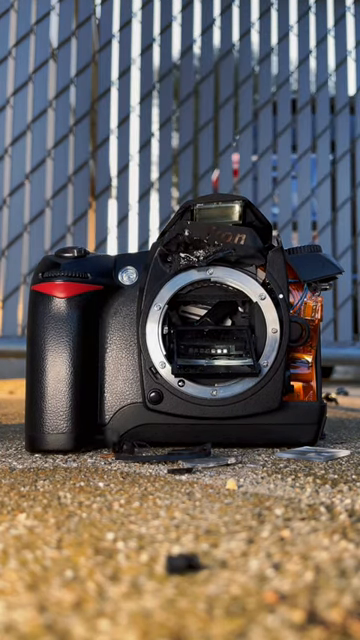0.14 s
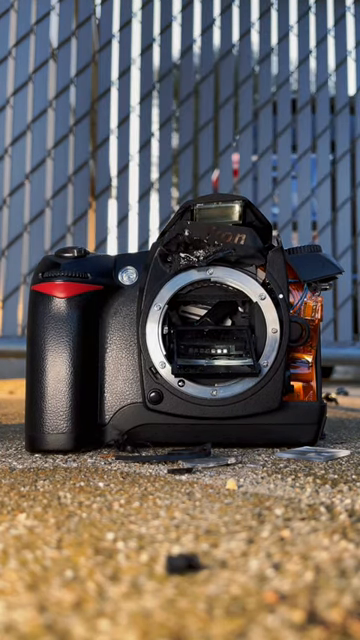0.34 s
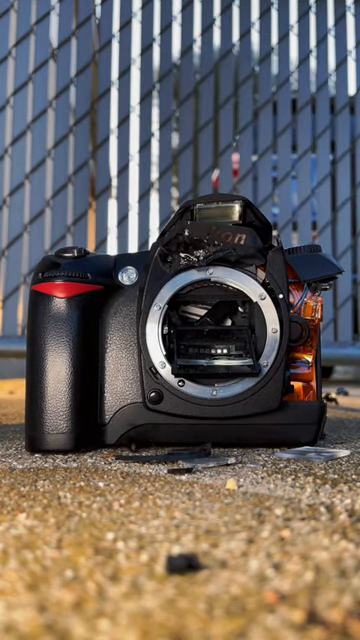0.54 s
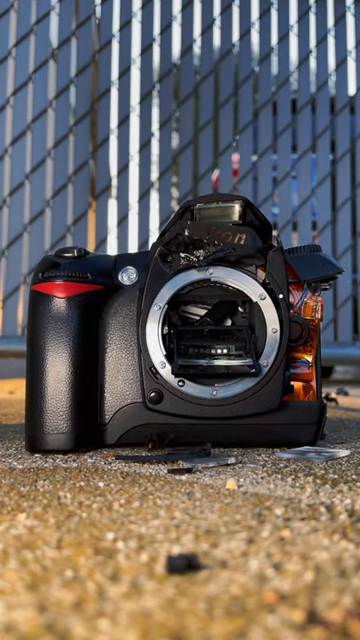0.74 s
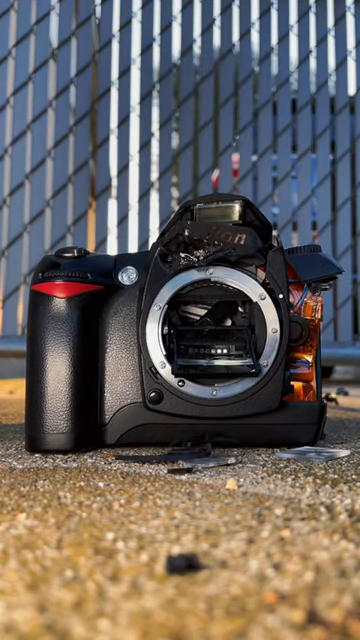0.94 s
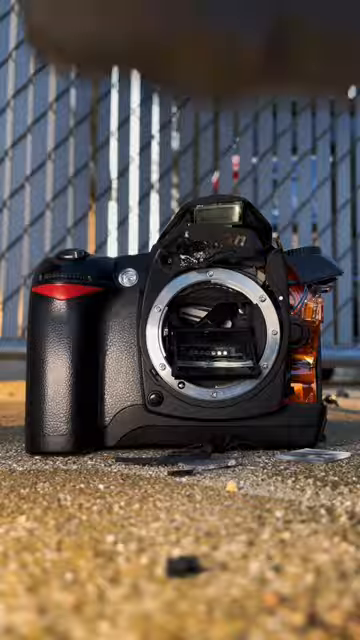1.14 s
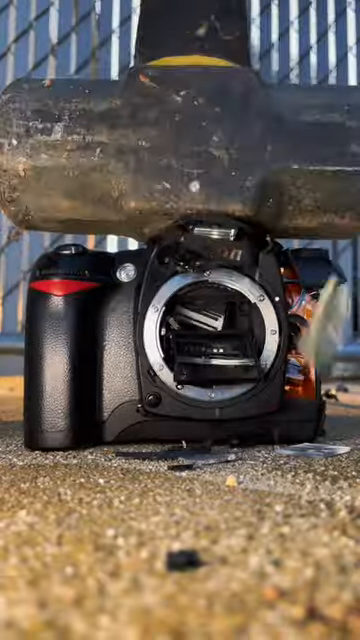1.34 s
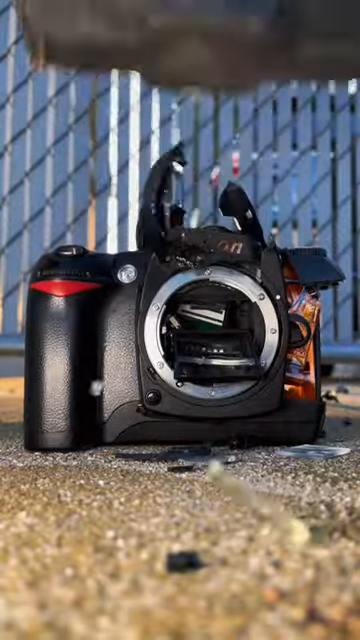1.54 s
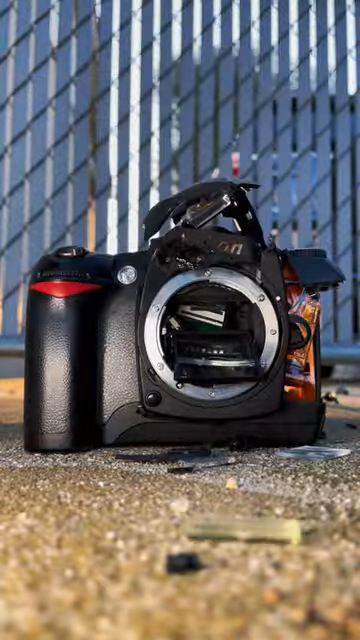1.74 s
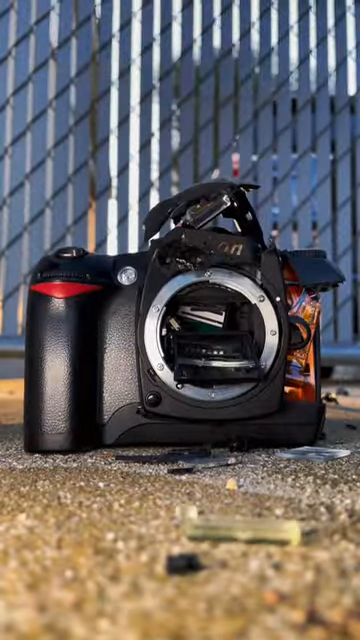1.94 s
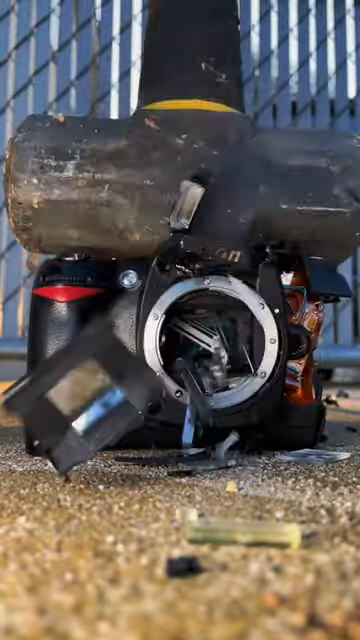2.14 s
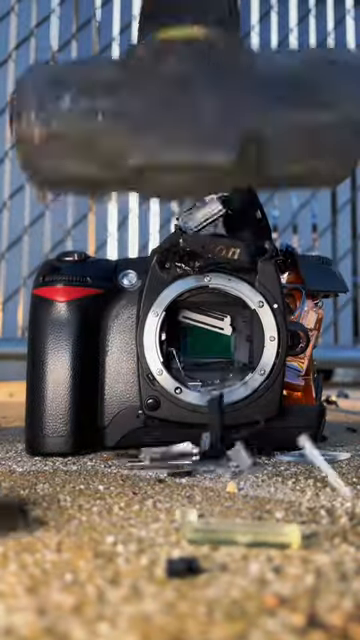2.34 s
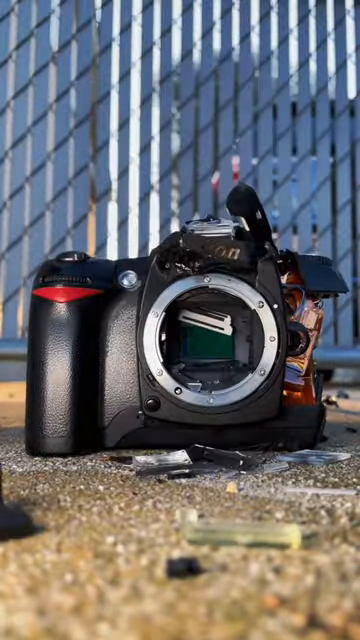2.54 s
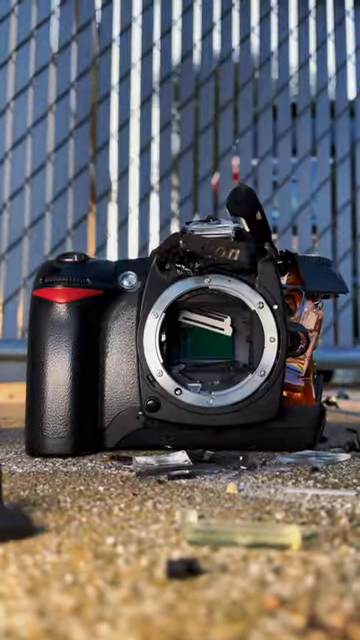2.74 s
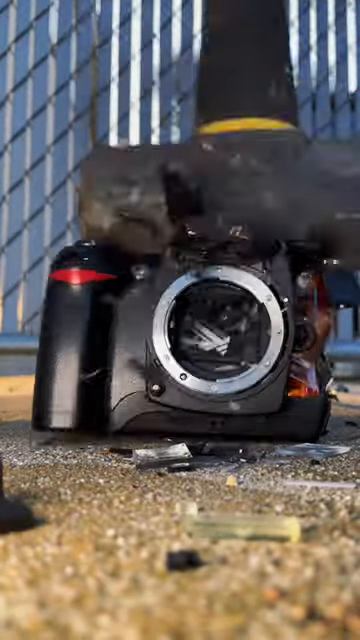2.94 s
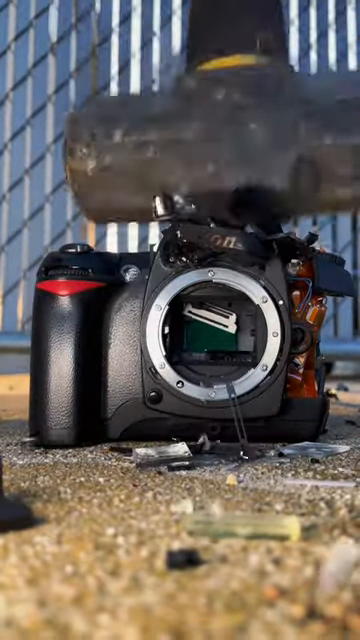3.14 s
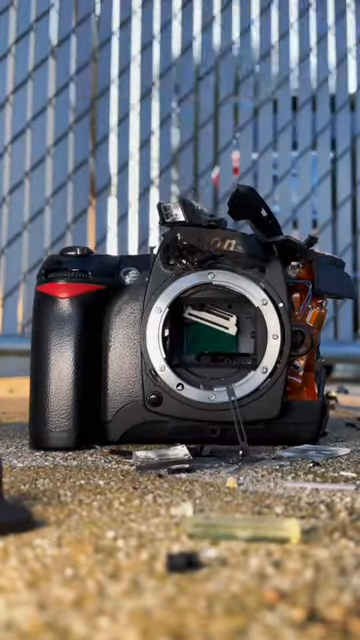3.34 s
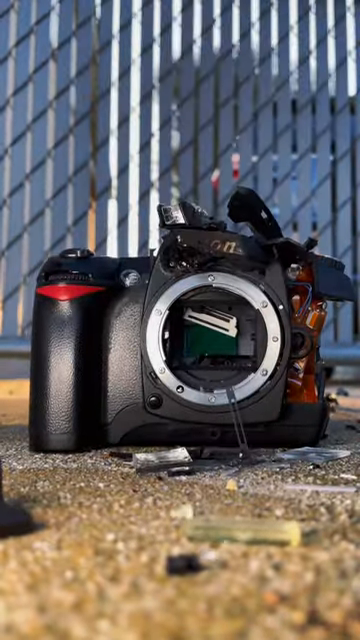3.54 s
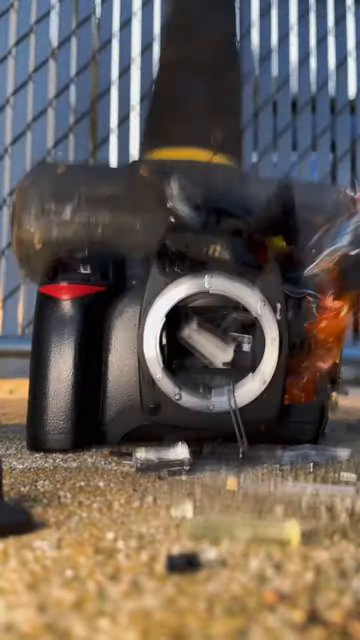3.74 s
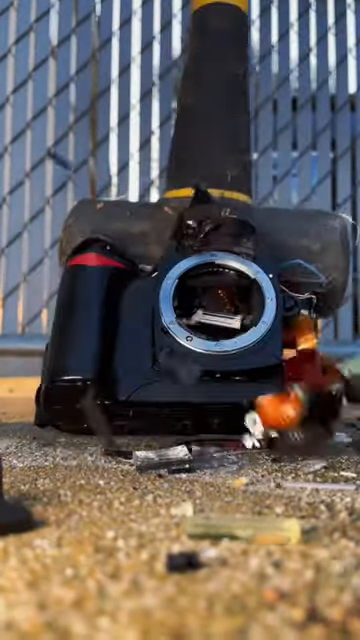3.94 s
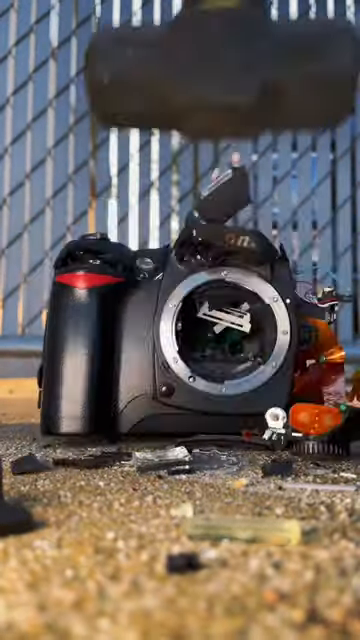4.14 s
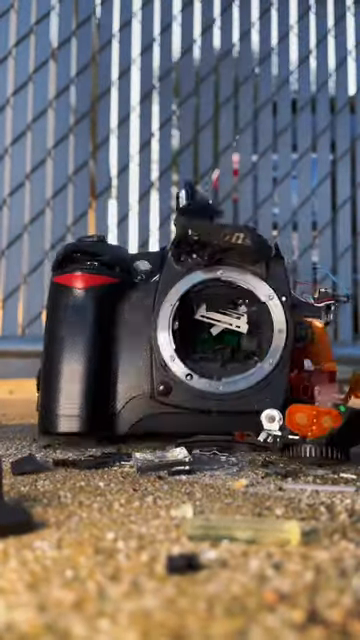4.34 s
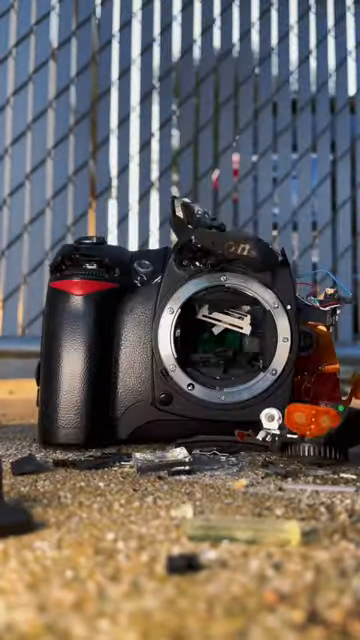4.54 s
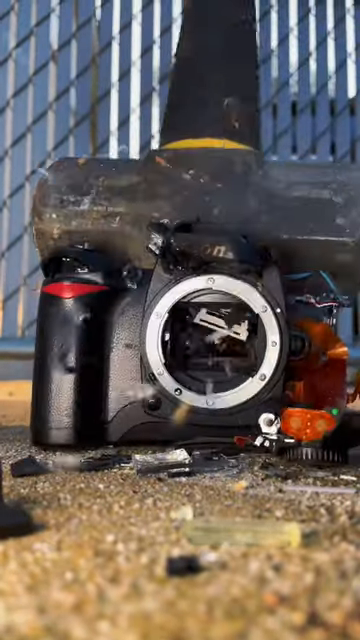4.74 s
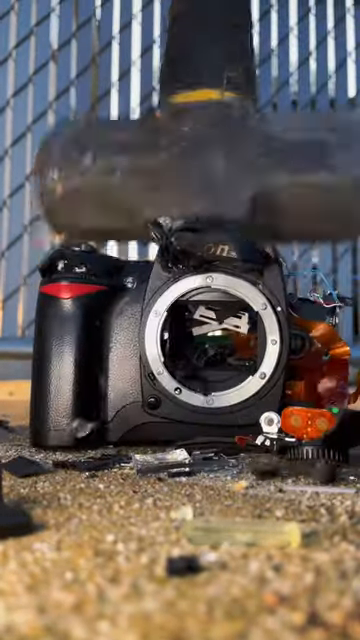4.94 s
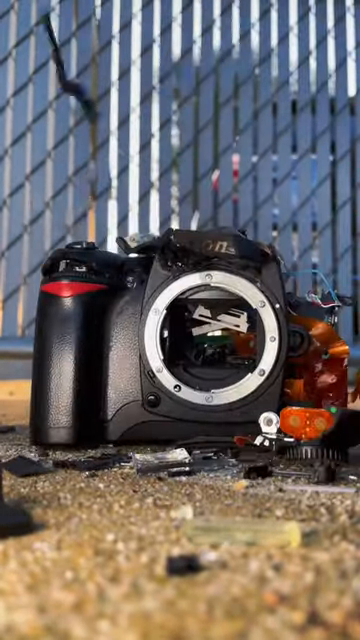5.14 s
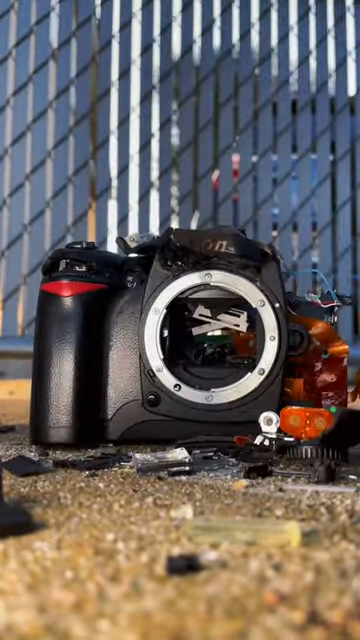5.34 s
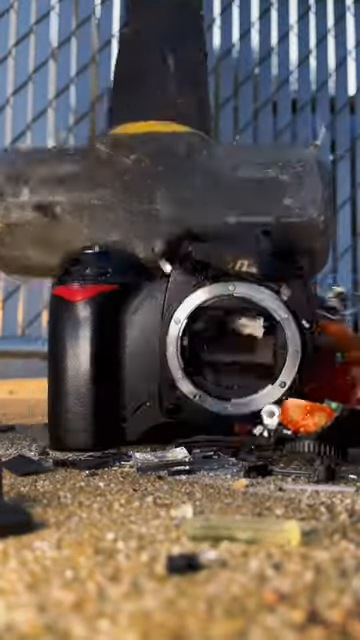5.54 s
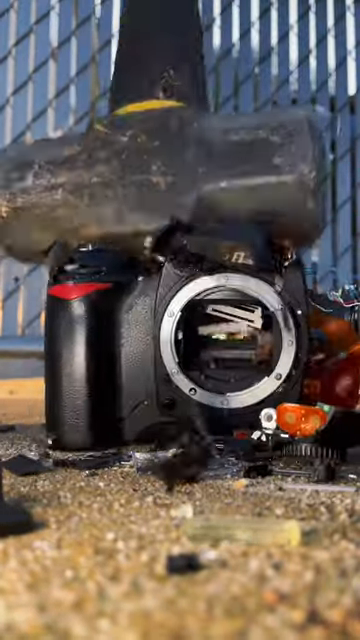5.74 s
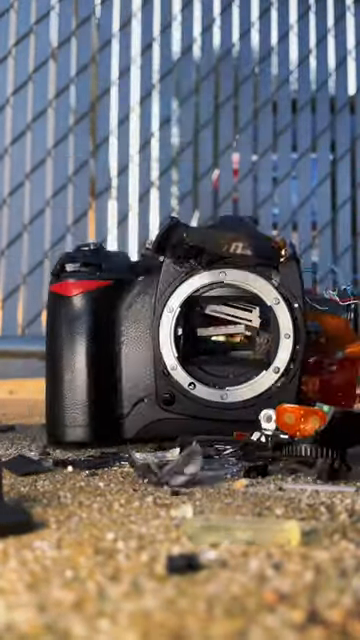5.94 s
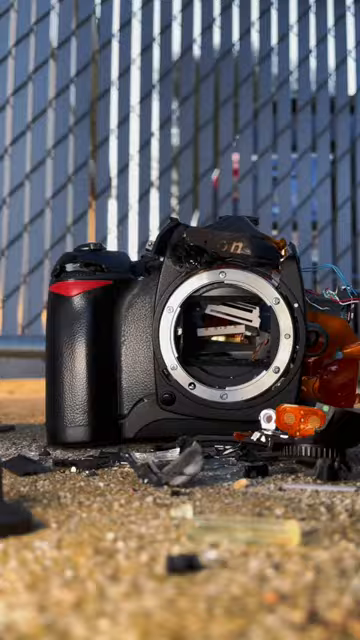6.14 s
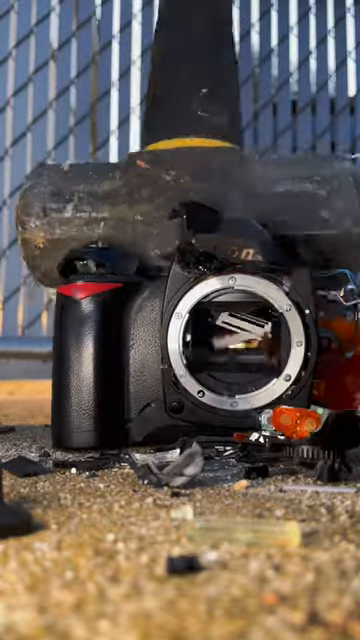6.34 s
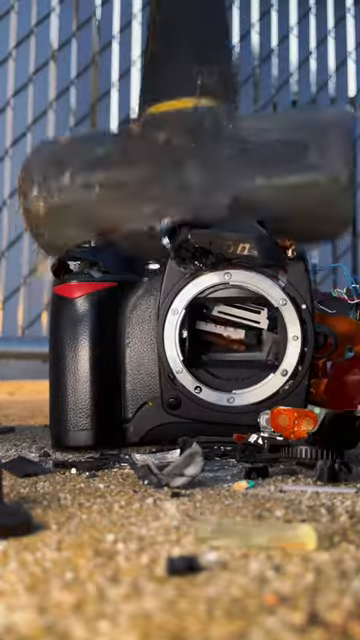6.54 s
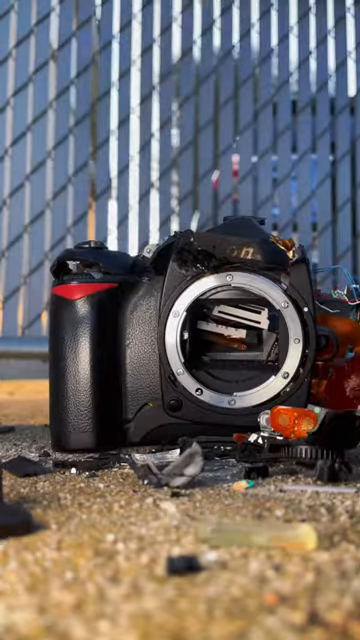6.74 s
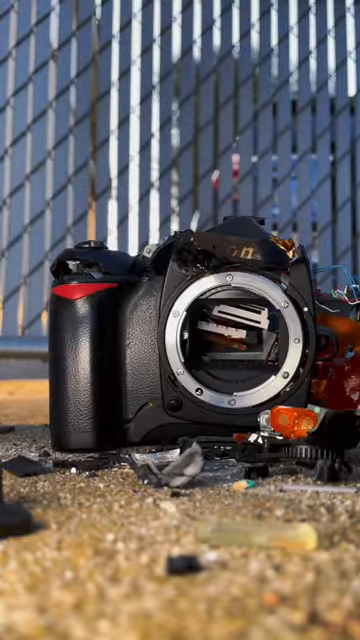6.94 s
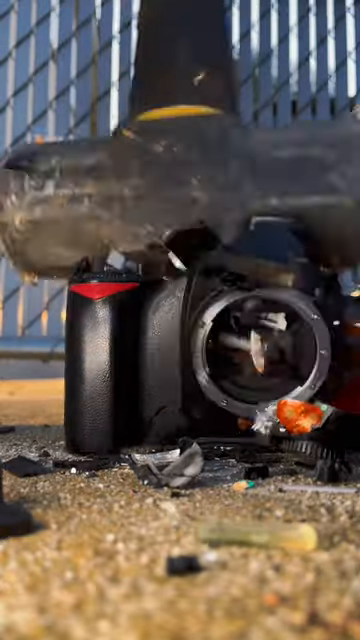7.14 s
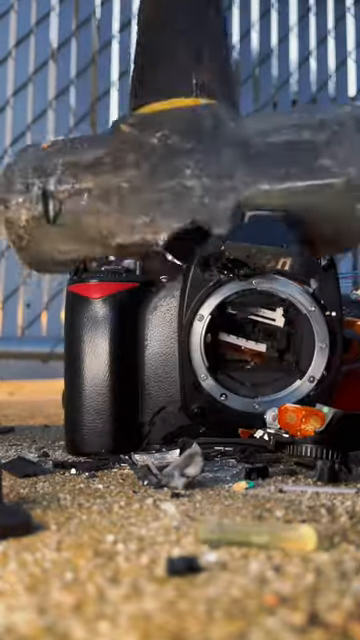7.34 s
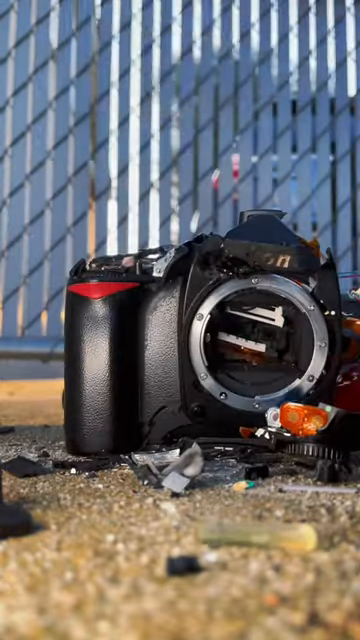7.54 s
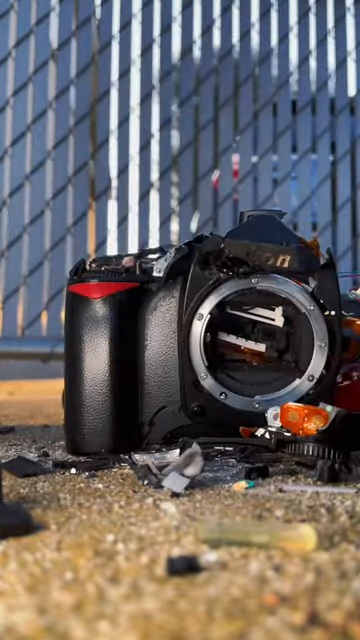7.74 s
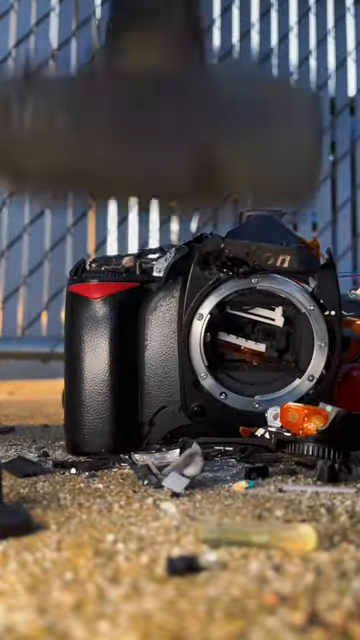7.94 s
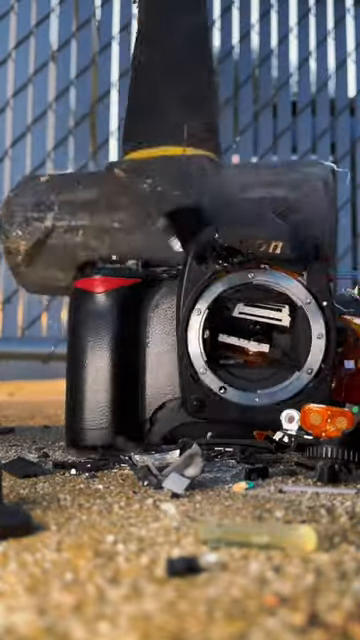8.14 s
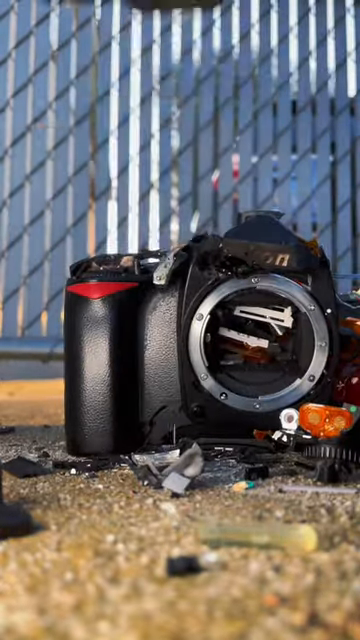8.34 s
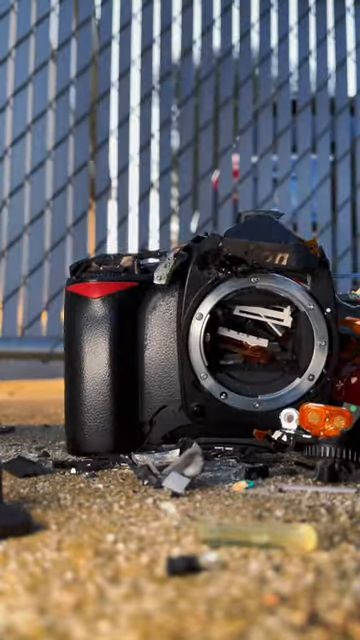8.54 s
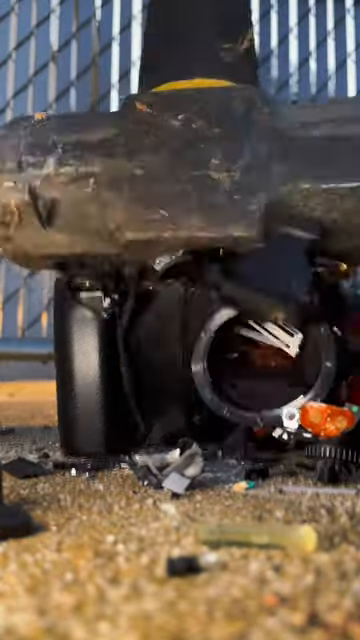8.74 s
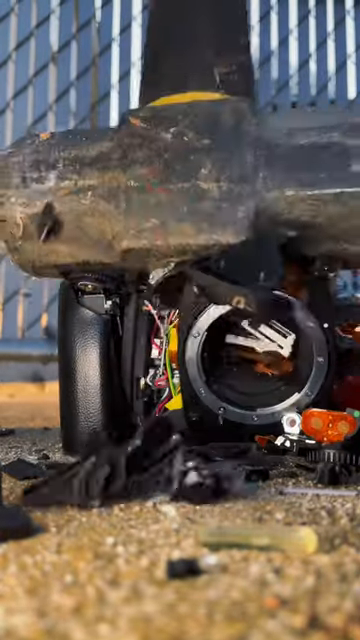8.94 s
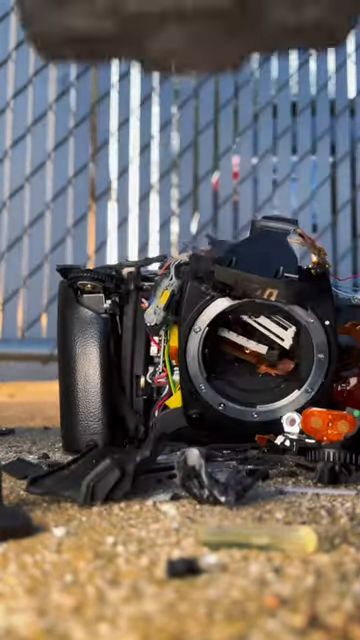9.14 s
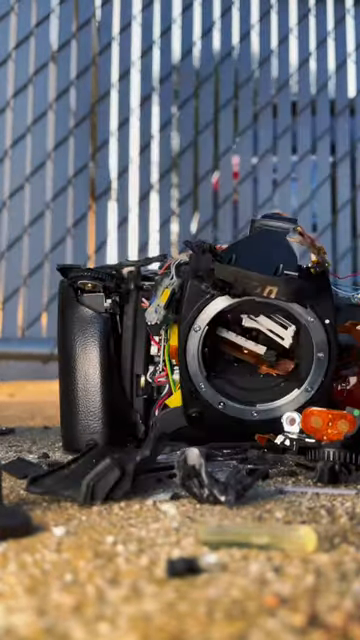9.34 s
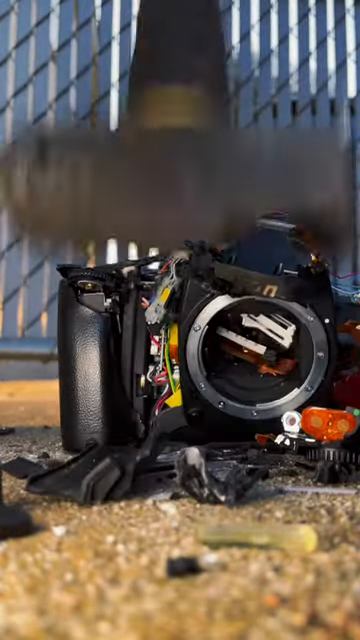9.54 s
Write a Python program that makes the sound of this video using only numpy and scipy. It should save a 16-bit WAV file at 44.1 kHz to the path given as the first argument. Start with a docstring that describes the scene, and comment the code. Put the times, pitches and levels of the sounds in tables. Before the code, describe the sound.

Very close, clipped cracks of crushing plastic, brief dropouts of silence, then skittering shards and tinkling bits on stone outdoors, faint traffic behind.

```python
"""Eleven clipped cracks, each cut off by a short silence, then rattling fragments over distant traffic.
A sledgehammer smashes a camera body on pavement, a hand's width from a phone.
Crushed plastic is dense random clicks through resonances; the jolt holds the microphone at its limit.
Clacks, spray and chips are short noises or clicks that ring; hard parts and shards are struck modes.
Thumps and the wobbling stand are decaying sines; traffic and the rustle of the swing are coloured noise."""
import sys
import numpy as np
from scipy import signal
from scipy.fft import rfft, irfft
from scipy.io import wavfile

SR = 44100
rng = np.random.default_rng(int(sys.argv[2]) if len(sys.argv) > 2 else 0)


def master(y):
    """Save y as 16-bit WAV."""
    cut = np.clip(np.atleast_2d(y).T, -1, 1)
    pcm = np.round(cut * 32767)  # scale
    wavfile.write(sys.argv[1], SR, pcm.astype(np.int16))


N = 427329

LIMIT = .7  # microphone limit, full scale = 1
TOP_HZ = 15900  # upper band edge

# Hammer blows. Each row: start in seconds, first inward swing in microphone limits, its length in seconds,
# time constant of the outward rise in seconds, time the microphone is free again in seconds,
# stand wobble in dB on its mode levels, spray level in dB, spray flight time in seconds.
BLOWS = [ (1.127, 0.053, 0.0011, 0.013, 1.311, -2.5, -39.5, 0.12),
         (2.001, 0.11, 0.0042, 0.028, 2.211, -1, -28, 0.092),
         (2.835, 1.06, 0.039, 0.13, 3.157, 5, -50.5, 0.14),
         (3.680, 0.27, 0.0026, 0.017, 3.874, -6.5, -32, 0.14),
         (4.603, 0.9, 0.057, 0.24, 4.822, -5, -34, 0.1), (5.427, 0.23, .004, 0.027, 5.67, 0, -35, 0.091),
         (6.244, 0.05, 0.0022, 0.012, 6.425, 1.5, -37, 0.082),
         (7.061, 0.054, .001, 0.013, 7.243, 3, -36, 0.1), (7.909, 0, 0.0012, .012, 8.1, 1, -33, 0.088),
         (8.704, 1.86, 0.0895, 0.027, 9.170, -1, -44.5, .12),
         (9.526, 0.18, 0.0022, 0.011, 9.64, -6.5, -48, 0.033)]
# Distant traffic spectrum. Each row: frequency in Hz, relative density in dB per Hz.
TRAFFIC_SPECTRUM = [(25, 1), (60, 0), (90, -4), (135, 2.5), (230, -3.5), (320, -4), (480, -10.5), (900, -4),
                    (1250, -16), (1900, -33), (4000, -34), (16000, -51.5)]
# Distant traffic level. Each row: time in seconds, rms level in dB.
TRAFFIC_LEVEL = [(0, -50.5), (.95, -51.5), (1.3, -47), (9.69, -46)]
# Rustle of the swung hammer. Each row: frequency in Hz, relative density in dB per Hz.
RUSTLE_SPECTRUM = [(500, -4), (1500, -0.5), (3200, -1), (5500, -10), (9000, -17), (16000, -19)]
# Dull thumps and knocks; the first two are faint low bumps before any blow.
# Each row: start in seconds, starting amplitude in dB, frequency in Hz, t60 in seconds.
THUMPS = [(.11, -34.5, 35, .13), (.295, -32.5, 36.8, .15), (2.886, -9, 62.7, .24),
          (3.882, -19.5, 120, .092), (4.665, -14, 47.8, .2), (7.061, -3.5, 190.4, .03),
          (7.062, 2, 649, .019), (8.767, 9, 325, .025), (8.801, .5, 95.5, .37), (9.207, -27, 639, .063),
          (9.227, -8, 51.8, .22), (9.272, -20, 110, .11)]
# Phone stand. Each row: mode frequency in Hz, typical level in dB, t60 in seconds.
STAND_MODES = [(53, -35, 1.6), (64.3, -28, 2.6), (73.2, -33, 2.2), (172, -43, 2.8), (221, -49, 1.2)]
# Single ticks and clacks on the pavement, mostly landing fragments, one faint tick before the first blow.
# Each row: start in seconds, peak in dB, ring in Hz, treble above 5 kHz against the rest in dB.
CLACKS = [(.444, -40, 3970, -2), (1.3547, -16, 6300, 3), (1.3766, -8.5, 1140, -19),
          (1.4528, -11.5, 7700, 1), (1.5846, -24.5, 5750, 17), (1.611, -15, 5660, 6),
          (1.9183, -27, 7800, 3), (2.2313, -9.5, 8200, 1), (2.2439, -11.5, 1190, -3), (2.257, -7, 8800, 19),
          (2.3174, -13.5, 5640, 4), (2.4237, -14, 3680, -7), (2.5287, -20, 3860, 2),
          (2.5414, -16, 2410, 6.5), (3.192, -26, 3860, -6), (3.3223, -31.5, 15500, 11.5),
          (3.418, -33.5, 4000, -.5), (3.478, -36, 4920, -1), (3.8821, -3, 2205, -18),
          (3.8954, -5.5, 4480, -3), (3.9125, -4, 3180, -8), (3.921, -5.5, 3870, 0),
          (4.004, -8.5, 2930, -1.5), (4.025, -15, 2600, -5), (4.0686, -15, 2970, -10),
          (4.1222, -17, 8700, 9), (4.226, -17, 2700, 4), (4.276, -10, 3040, -10), (4.3832, -29, 3300, -5),
          (4.4244, -21, 4500, 2.5), (4.541, -22.5, 5800, 9), (4.8351, -6, 1230, -1),
          (4.8682, -22, 3300, -6), (4.9287, -15.5, 3670, -13), (5.0203, -22, 1700, -10),
          (5.2055, -8, 1810, -13), (5.3382, -28, 7880, 10), (5.734, -15, 12000, 12),
          (5.8085, -11.5, 7200, 15), (5.8824, -26.5, 3860, -4), (5.928, -36, 3020, -4),
          (6.444, -20.5, 1530, -18), (6.475, -13.5, 2170, -4), (6.4878, -6, 2340, -5),
          (6.5255, -16, 9800, 4), (6.6628, -29.5, 4110, -3), (7.2428, -13.5, 7430, 11),
          (7.263, -21, 1730, -8), (7.314, -19, 6030, 6), (7.3718, -24, 5850, 9), (7.4305, -27.5, 7400, 9),
          (7.5177, -26, 2680, -4), (7.5725, -17.5, 2830, 5), (7.625, -27, 5990, -1),
          (7.6466, -24.5, 4110, 9), (7.673, -28, 6460, 3), (8.1005, -13, 2355, -2),
          (8.1134, -13.5, 3620, -3), (8.1358, -15.5, 2040, -7), (8.1834, -18, 2170, -3),
          (8.2183, -20.5, 2440, -5), (8.3122, -22, 930, -10), (8.3495, -13, 1670, -6),
          (8.3599, -12, 2140, -7), (8.4213, -9.5, 6000, 0), (8.4445, -15.5, 2310, -17),
          (8.4885, -22.5, 3140, -4), (9.2383, -25, 3360, -1.5), (9.6833, -18.5, 11240, 3)]
# Colour of a contact with the stone. Each row: frequency in Hz, gain in dB.
CONTACT_SPECTRUM = [(100, -20), (500, -9), (1100, 0.5), (3000, 1), (7000, -2), (11000, -7.5), (16000, -8)]
# Colour of the fine spray. Each row: frequency in Hz, gain in dB.
SPRAY_SPECTRUM = [(100, -8.5), (500, -9.5), (1100, 0.5), (1900, -7.5), (3100, 2.5), (4600, -5.5),
                  (6500, -1.5), (10000, -9.5), (16000, -12.5)]
# Shell giving way under the hammer. Each row: start in seconds, peak in dB, length in seconds,
# resonance in Hz.
CRUSHES = [(1.129, 14, .0074, 6160), (2.001, 16, .017, 6530), (2.835, 12.5, .023, 3420),
           (2.860, 1.5, .036, 4270), (2.874, 8, .0087, 3050), (2.903, -15.5, .048, 3200),
           (3.680, 10, .011, 3050), (4.601, 10, .02, 2630), (4.622, 1, .038, 3570), (4.662, 4, .015, 3500),
           (4.699, -9.5, .022, 5500), (4.729, -23.5, .037, 3500), (5.428, 16, .018, 2400),
           (6.247, 10, .010, 2040), (7.060, 10, .0087, 3480), (7.909, 12.5, .0066, 7080),
           (8.703, 12, .011, 2040), (8.804, -6.5, .064, 3460), (9.527, 10, .0061, 3560)]
# Single parts snapping under the hammer. Each row: start in seconds, peak in dB, length in seconds.
SNAPS = [(2.028, 5, .0027), (2.070, 5.5, .0018), (2.077, 5.5, .0035), (2.898, 9.5, .0014),
         (3.037, -7, .0011), (3.069, -1, .0017), (3.711, 8, .0004), (3.728, 5.5, .0003),
         (3.776, 2.5, .0006), (3.803, 1.5, .0005), (3.814, -1.5, .0004), (3.855, -10, .0012),
         (4.688, 3, .0053), (4.722, 1, .0045), (4.785, -10.5, .0022), (5.476, 0, .0018), (5.490, 2, .0029),
         (5.497, 4, .001), (5.546, -2, .0005), (7.11, 5, .0009), (8.733, 7, .0014), (8.767, -2.5, .0033),
         (8.786, -11, .008), (8.872, 14, .0032), (8.908, 2, .0022), (9.145, -8, .0028), (9.54, 3.5, .0014),
         (9.588, -4.5, .0005)]
# Colour of the breaking shell. Each row: frequency in Hz, gain in dB.
SHELL_SPECTRUM = [(40, -13.5), (200, -5), (600, -4.5), (1500, -3.5), (3300, -4), (6000, -5), (9000, -10.5),
                  (16000, -17)]
# Small hard part dropping. Each row: start in seconds, level in dB.
PINGS = [(1.452, -36), (1.611, -35.5)]
# Its modes. Each row: frequency in Hz, typical level in dB, t60 in seconds.
PING_MODES = [(2024, -12.5, .15), (3180, -7.5, .15), (3666, -3, .25), (4020, -7, .2), (4900, -10, .15),
              (5470, -4.5, .16), (5660, -2.5, .2), (6100, -7, .18), (6850, -8, .18), (7060, -6, .28),
              (7596, -6, .2), (8651, -5, .2), (9227, -9, .16), (11400, -12, .16), (12660, -12, .14)]
# Tiny screws and shards that sing on after landing.
# Each row: start in seconds, typical level in dB, frequency in Hz, nominal t60 in seconds.
TINKLES = [(2.224, -30, 8930, .44), (2.257, -33, 14510, .17), (2.275, -32, 10500, .18),
           (2.529, -40, 3600, .18), (2.54, -38, 2400, .15), (3.939, -30, 8940, .14),
           (4.003, -29, 10260, .06), (5.084, -43, 1950, .2), (5.734, -29.5, 3740, .041),
           (5.808, -32.5, 3830, .064), (5.969, -51, 4460, .15), (7.372, -41, 5830, .12),
           (7.626, -41, 5980, .059), (8.39, -37.5, 7030, .18)]

RUSTLE_REST_DB, RUSTLE_SWING_DB = -73, -61.5
SWING_RISE_S, SWING_FALL_S = .17, .4  # time constants
HOP_S, HOP_LOSS_DB = .027, 16  # typical delay of the second touch, its loss
CHIP_FIRST_S, CHIP_SPREAD_S = .19, .33  # after the blow
CHIP_OVER_SPRAY_DB, CHIP_FADE_DB_PER_S = 16, 29
CHIP_HZ, CHIP_TREBLE_DB_PER_OCTAVE = 4200, 9  # a smaller chip rings higher and ticks brighter
SNAP_HZ = 3600
BOUNCE_S, BOUNCE_SHARE, BOUNCE_LOSS_DB = .049, .8, 5  # first flight, share left for the next, loss


def undb(db):
    """Decibels to gain."""
    return 10 ** (np.asarray(db) / 20)


def clock(length_s):
    """Sample times in seconds."""
    return np.arange(int(length_s * SR)) / SR


def fade(t, t60):
    """Exponential decay from time 0, 60 dB down at t60."""
    return np.exp(-np.log(1000) * np.maximum(t, 0) / t60)


def add(track, start_s, sound):
    """Mix a sound into a track, cut at the end."""
    i = int(np.clip(start_s * SR, 0, N - 1))
    track[i:i + len(sound)] += sound[:N - i]


def unit(x):
    """Scale to rms 1."""
    return x / np.sqrt(np.mean(x ** 2))


def colour(x, points, size=1024):
    """Causal minimum-phase filter with a (Hz, dB) spectrum, built from its cepstrum."""
    hz, db = np.transpose(points)
    f = np.maximum(np.fft.rfftfreq(size, 1 / SR), 1)
    log_gain = np.log(undb(np.interp(np.log(f), np.log(hz), db)))
    cepstrum = irfft(log_gain)
    # fold onto positive times
    cepstrum[1:size // 2] *= 2
    cepstrum[size // 2 + 1:] = 0
    impulse = irfft(np.exp(rfft(cepstrum)))
    return signal.fftconvolve(x, impulse)[:len(x)]


def resonate(x, hz, q):
    """One resonance, gain 1 at its centre."""
    b, a = signal.iirpeak(min(hz, TOP_HZ), max(q, 1), fs=SR)
    return signal.lfilter(b, a, x)


def grains(count, rate_hz, spread_db):
    """Random clicks of either sign at a mean rate, most small and a few large."""
    hit = rng.random(count) < rate_hz / SR
    sign = rng.choice([-1, 1], count)
    size = np.minimum(rng.exponential(size=count), 4)
    return hit * sign * undb(spread_db * size)


def ring(modes, length_s):
    """Decaying modes, each struck a little differently."""
    t = clock(length_s)
    return sum(undb(db + rng.normal()) * np.sin(2 * np.pi * hz * t) * fade(t, t60) for hz, db, t60 in modes)


def chatter(t, t60, rate_hz):
    """A first landing, then small random touches that die away."""
    touches = grains(len(t), rate_hz, spread_db=2) * fade(t, t60)
    touches[0] = 2
    return touches / np.linalg.norm(touches)


def background():
    """Traffic hums far off; a faint rustle wavers above it and swells with each swing."""
    t = np.arange(N) / SR
    traffic_db = np.interp(t, *np.transpose(TRAFFIC_LEVEL))
    distance = np.min([np.maximum((s - t) / SWING_RISE_S, (t - s) / SWING_FALL_S) for s, *_ in BLOWS], axis=0)
    swing = np.exp(-distance)  # 1 at each blow
    waver = np.interp(t, np.linspace(0, N / SR, 90), rng.standard_normal(90))
    traffic = unit(colour(rng.standard_normal(N), TRAFFIC_SPECTRUM, size=8192))
    rustle = unit(colour(rng.standard_normal(N), RUSTLE_SPECTRUM))
    rustle_gain = (undb(RUSTLE_REST_DB) + undb(RUSTLE_SWING_DB) * swing) * undb(2 * waver)
    return undb(traffic_db) * traffic + rustle_gain * rustle


def ground():
    """Dull thumps and knocks as decaying sines; the stand's modes wobble from each blow to the next."""
    out, t = np.zeros(N), clock(.6)
    for s, db, hz, t60 in THUMPS:
        add(out, s, -undb(db) * np.sin(2 * np.pi * hz * t) * fade(t, t60))
    ends = [blow[0] for blow in BLOWS[1:]] + [N / SR]
    for (s, *_, wobble_db, spray_db, flight_s), end_s in zip(BLOWS, ends):
        add(out, s, undb(wobble_db) * ring(STAND_MODES, end_s - s))
    return out


def hops():
    """Each tick or clack is followed by a second, softer touch: rows as in CLACKS."""
    return [(s + HOP_S * rng.uniform(.5, 1.5), db - HOP_LOSS_DB, hz, treble_db)
            for s, db, hz, treble_db in CLACKS]


def chips(count=10, scatter_db=2.5, scatter_octaves=.6):
    """Small chips land after each blow, thickly then thinly, the later the weaker: rows as in CLACKS."""
    rows = []
    for s, *_, spray_db, flight_s in BLOWS:
        for k in range(count):
            age_s = CHIP_FIRST_S + CHIP_SPREAD_S * ((k + rng.random()) / count) ** 2
            db = spray_db + CHIP_OVER_SPRAY_DB - CHIP_FADE_DB_PER_S * age_s + scatter_db * rng.normal()
            octaves = scatter_octaves * rng.normal()
            rows.append((s + age_s, db, CHIP_HZ * 2 ** octaves, CHIP_TREBLE_DB_PER_OCTAVE * octaves))
    return rows


def clacks(tick_t60=.012, skid_db=-15, skid_t60=.07, ring_db=11, ring_q=16, overtone_db=7, overtone_q=60):
    """Each contact ticks on the stone, skids briefly and rings with its own note and a few stray overtones."""
    out, t = np.zeros(N), clock(.088)
    lowpass = signal.butter(3, 5000, fs=SR, output="sos")
    highpass = signal.butter(3, 5000, "hp", fs=SR, output="sos")
    for s, db, hz, treble_db in CLACKS + hops() + chips():
        contact = rng.standard_normal(len(t)) * fade(t, tick_t60)
        skid = unit(grains(len(t), 1700, spread_db=2)) * fade(t, skid_t60)
        tick = colour(contact + undb(skid_db) * skid, CONTACT_SPECTRUM)
        overtones = sum(resonate(tick, f, overtone_q) for f in rng.uniform(1500, 12000, size=5))
        # small, high pieces ring for more cycles than large ones
        note = resonate(tick, hz, ring_q * hz / 4000)
        clack = tick + undb(ring_db) * note + undb(overtone_db) * overtones
        lower = unit(signal.sosfilt(lowpass, clack))
        treble = unit(signal.sosfilt(highpass, clack))
        clack = lower + undb(treble_db) * treble
        add(out, s, undb(db) * clack / np.abs(clack).max())
    return out


def jolts(creep_s=.068):
    """Each shock throws the microphone off centre, up to twice its limit; it creeps back exponentially."""
    out, t = np.zeros(N), clock(1.1)
    for s, inward, swing_s, rise_s, free_s, *_ in BLOWS:
        dip = inward * np.sin(np.pi * np.minimum(t / swing_s, 1))
        thrown = 2 * (1 - np.exp(-np.maximum(t - swing_s, 0) / rise_s))
        creep = np.exp((free_s - s - t) / creep_s)  # reaches the limit at free_s
        add(out, s, LIMIT * (np.minimum(thrown, creep) - dip))
    return out


def spray(rate_hz=500, ring_db=15, ring_q=60, clump_db=4):
    """Splinters rain down in clumps, thickest at their flight time, each size with its own note."""
    out, t = np.zeros(N), clock(1.1)
    for s, *_, db, flight_s in BLOWS:
        notes_hz = np.geomspace(1100, 13000, num=24) * np.exp(.06 * rng.standard_normal(24))
        patter = 0
        for hz in notes_hz:
            landings = grains(len(t), rate_hz / len(notes_hz), spread_db=2.5)
            patter = patter + landings + undb(ring_db) * resonate(landings, hz, ring_q)
        knots = t[::800]
        clumps = np.interp(t, knots, rng.standard_normal(len(knots)))
        patter = unit(colour(patter, SPRAY_SPECTRUM) * undb(clump_db * clumps))
        rain = t / flight_s * np.exp(1 - t / flight_s)  # peaks at 1
        add(out, s, undb(db) * patter * rain)
    return out


def cracks(rate_hz=9000, release_t60=.011, ring_db=3, ring_q=6):
    """Dense fractures run through the shell while it is crushed, and ring the piece that gives way."""
    out, t = np.zeros(N), clock(.1)
    for s, db, length_s, hz in CRUSHES + [(*snap, SNAP_HZ) for snap in SNAPS]:
        fractures = grains(len(t), rate_hz, spread_db=2)
        fractures[0] = 2
        burst = colour(fractures * fade(t - length_s, release_t60), SHELL_SPECTRUM)
        burst = burst + undb(ring_db) * resonate(burst, hz, ring_q)
        # the largest peak points inward
        add(out, s, -undb(db) * burst / burst[np.argmax(np.abs(burst))])
    return out


def pings(chatter_t60=.16, tick_db=9, count=4):
    """The hard part bounces ever lower and chatters on the stone, every touch a tick and a fresh ring."""
    out, t = np.zeros(N), clock(.3)
    for s, drop_db in PINGS:
        for k in range(count):
            # it lands on a different spot each time, which favours other modes
            modes = [(hz, db + 3 * rng.normal(), t60) for hz, db, t60 in PING_MODES]
            body = ring(modes, length_s=.3)
            body += undb(tick_db) * rng.standard_normal(len(body)) * fade(t, .0092)
            touches = chatter(t, chatter_t60, rate_hz=260)
            add(out, s, undb(drop_db - k * BOUNCE_LOSS_DB) * signal.fftconvolve(touches, body))
            s += BOUNCE_S * BOUNCE_SHARE ** k
    return out


def tinkles(twin_db=-4):
    """A slightly uneven shard has two close modes, which beat, and is struck afresh as it skitters."""
    out = np.zeros(N)
    for s, db, hz, t60 in TINKLES:
        twin_hz = hz * (1 + rng.uniform(.00648, .024))
        body = ring([(hz, db, t60 / 2), (twin_hz, db + twin_db, t60 / 2)], length_s=.3)
        touches = chatter(clock(.3), 2 * t60, rate_hz=300)
        add(out, s, signal.fftconvolve(touches, body))
    return out


def yard(x, wet_db, t60):
    """Fence and walls return a thin, short echo: decaying random reflections after 8 ms."""
    t = clock(.5)
    reflections = colour(grains(len(t), 2500, spread_db=1.5), [(200, 3), (4000, .5), (16000, -6)])
    echo = reflections * fade(t, t60) * (t > .008)
    return undb(wet_db) * signal.fftconvolve(x, echo / np.linalg.norm(echo))[:N]


def scene():
    """Everything that reaches the microphone."""
    shell = cracks()
    debris = clacks() + spray() + pings() + tinkles()
    echoes = yard(shell, wet_db=-22, t60=.15) + yard(debris, wet_db=-19.5, t60=.097)
    return (shell + debris + echoes + ground() + jolts() + background())[None]


def record(dry):
    """Hard clipping blocks sound while held at the limit; a coupling capacitor drains the offset."""
    fine = signal.resample_poly(dry, 2, 1, axis=1)  # clip at twice the rate against aliasing
    clipped = signal.resample_poly(np.clip(fine, -LIMIT, LIMIT), 1, 2, axis=1)
    b, a = signal.butter(1, 1.8, "hp", fs=SR)
    coupled = signal.lfilter(b, a, clipped)
    lowpass = signal.firwin(161, TOP_HZ, fs=SR, window="blackman")
    return signal.fftconvolve(coupled, lowpass[None], "same")


dry = scene()
out = record(dry)
master(out)
```